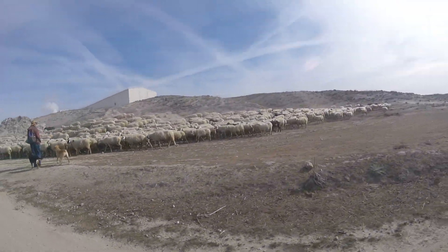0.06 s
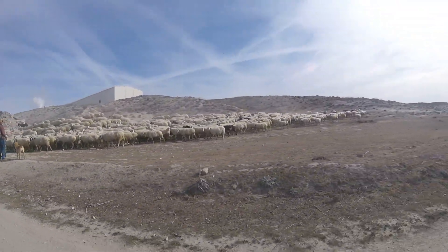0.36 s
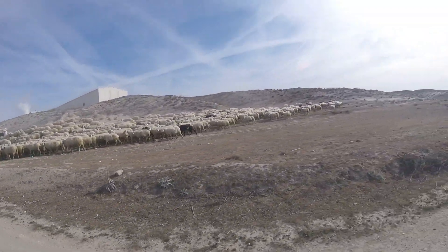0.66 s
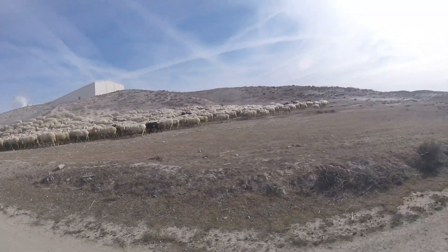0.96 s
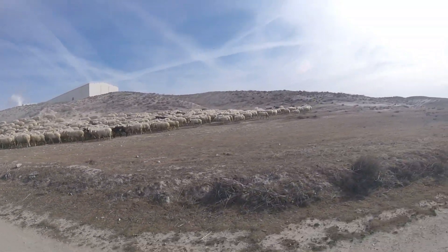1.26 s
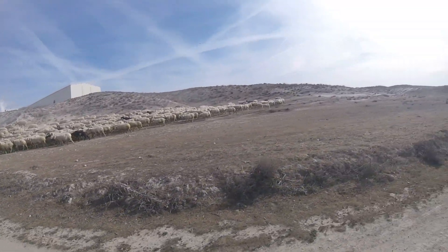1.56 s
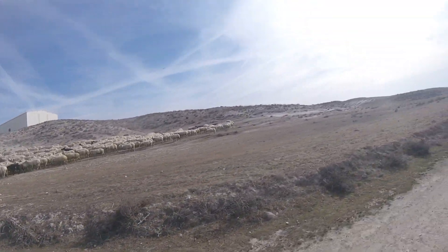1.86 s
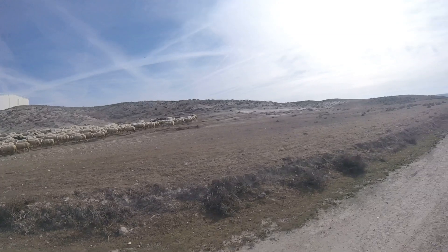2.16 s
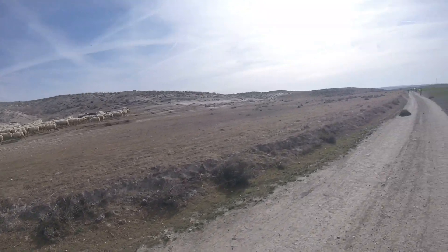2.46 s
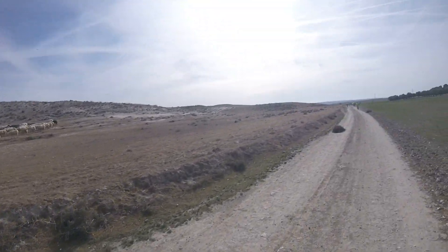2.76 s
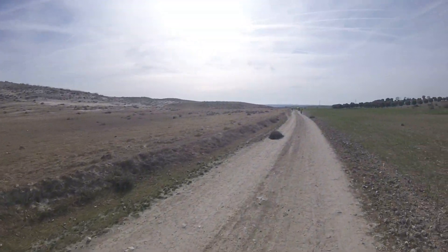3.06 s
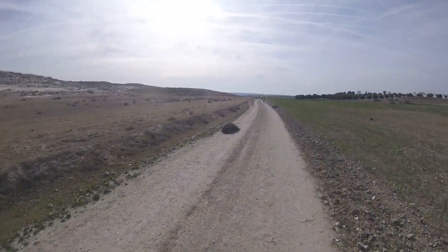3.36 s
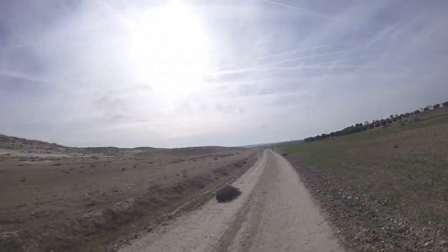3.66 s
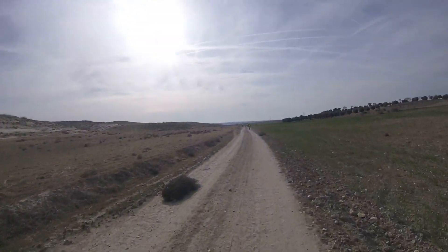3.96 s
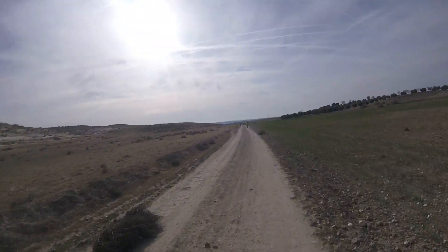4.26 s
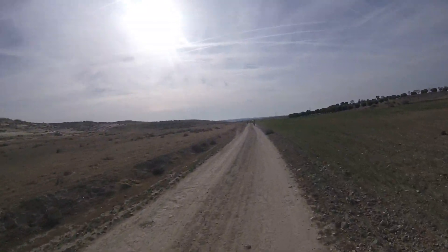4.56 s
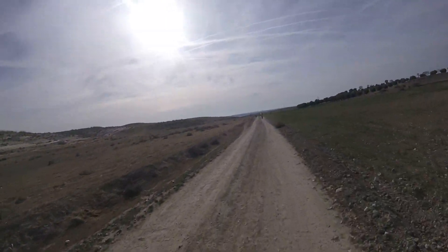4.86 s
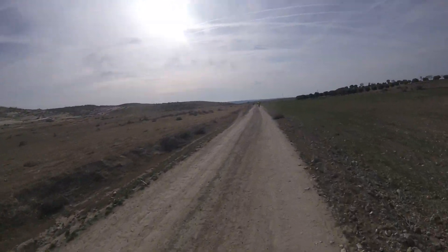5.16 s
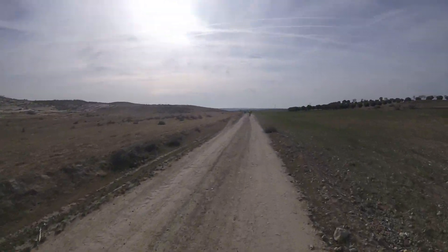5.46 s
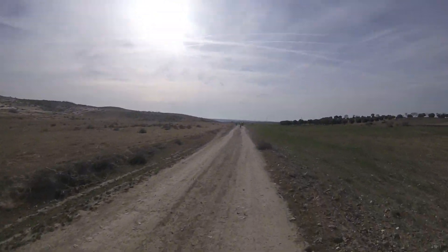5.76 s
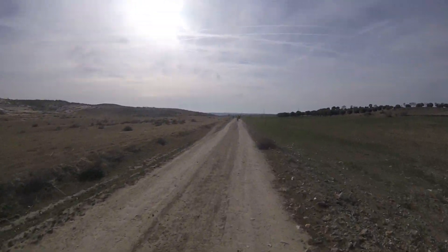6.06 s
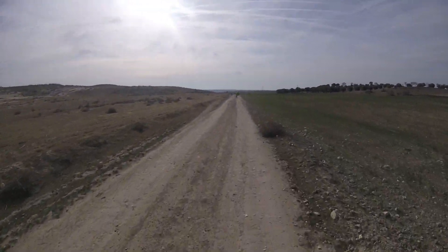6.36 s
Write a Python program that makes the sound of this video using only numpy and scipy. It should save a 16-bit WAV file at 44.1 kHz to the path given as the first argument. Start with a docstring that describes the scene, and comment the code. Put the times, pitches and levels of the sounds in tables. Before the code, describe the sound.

A bicycle rolls along a gravel track outdoors, heard from a microphone moving with it. For the first two seconds, wind dominates: a deep rumble with irregular buffeting, a fluttering rush and small slaps on the microphone. Scattered stone clicks come through, growing more frequent from about one second. Loose metal parts ping lightly around 1.7 and 2 seconds, with a faint rattle. By 2.4 seconds the wind falls to a lower rumble with brief gusts, leaving a soft tyre murmur and a faint hum from the bicycle. From about 3 to 5.7 seconds the tyres crunch through patches of loose gravel, and stones snap out in quick, sharp, irregular clicks, one stronger near 5.5 seconds. At about 5.7 seconds the wind returns with a hollow, buffeting roar, which continues over the crackling grit until the end at about 6.6 seconds.

```python
"""A gravel track in open country: a bicycle rolls round a bend and down the straight, carrying a camera.
Turbulent pressure buffets the microphone in the bend, drops to a low rumble, then picks up again.
Rolling contact makes the tyres murmur and the frame hum; grit crunches and stones snap out, their
impacts ringing briefly in the camera's housing. Loose metal parts rattle and ping faintly."""
import sys
import numpy as np
from scipy import signal
from scipy.fft import rfft, irfft, next_fast_len
from scipy.io import wavfile
from scipy.ndimage import uniform_filter1d

SR = 44100
rng = np.random.default_rng(int(sys.argv[2]) if len(sys.argv) > 2 else 0)


def master(y):
    """Save y as 16-bit WAV."""
    cut = np.clip(np.atleast_2d(y).T, -1, 1)
    pcm = np.round(cut * 32767)  # scale
    wavfile.write(sys.argv[1], SR, pcm.astype(np.int16))


N = 291501


def from_db(db):
    """Amplitude ratio of a level in decibels."""
    return 10 ** (np.asarray(db) / 20)

def unit_rms(x):
    """Normalisation to rms 1."""
    return x / np.sqrt(np.mean(x ** 2) + 1e-20)

def in_time(rows):
    """Linear interpolation of (time [s], value) rows at every sample."""
    return np.interp(np.arange(N) / SR, *np.transpose(rows))

def drift(hz):
    """Random modulation: low-passed noise of rms 1, computed at a tenth of the sample rate."""
    pole = np.exp(-20 * np.pi * hz / SR)
    slow = signal.lfilter([1], [1, -2 * pole, pole * pole], rng.standard_normal(N // 10 + 4002))[4000:]
    return np.interp(np.arange(N) / 10, np.arange(len(slow)), unit_rms(slow))

def swell(s, length):
    """Hann window, rising from 0 to 1 and back, centred on time s."""
    return np.cos(np.pi * np.clip((np.arange(N) / SR - s) / length, -.5, .5)) ** 2

def butterworth(x, hz, kind, order):
    """Filter with a maximally flat passband."""
    return signal.sosfilt(signal.butter(order, hz, kind, fs=SR, output="sos"), x)

def colour(x, spectrum):
    """Minimum-phase filtering by the given spectrum; rms 1."""
    size = 2 * next_fast_len(N // 2 + SR // 10)
    hz, level_db = np.transpose(spectrum)
    grid = np.maximum(np.fft.rfftfreq(size, 1 / SR), 1)
    magnitude = from_db(np.interp(np.log(grid), np.log(hz), level_db))
    cepstrum = irfft(np.log(magnitude))
    response = np.exp(rfft(2 * cepstrum[:size // 2], size))
    return unit_rms(irfft(rfft(x, size) * response)[:N])

def resonate(x, hz, width):
    """Damped resonator with a peak gain of 1."""
    r = np.exp(-np.pi * width / SR)
    feedback = [1, -2 * r * np.cos(2 * np.pi * hz / SR), r * r]
    return signal.lfilter(np.array([1, 0, -1]) * (1 - r * r) / 2, feedback, x)

def add(track, s, sound):
    """Superposition of a sound on a track at time s."""
    at = int(np.clip(s * SR, 0, N - 1))
    track[at:at + len(sound)] += sound[:N - at]

def lumpy_noise(spectrum, depth_db, lump_hz, steady_s):
    """Intermittency: noise comes in quick lumps while its longer-term power holds."""
    x = colour(rng.standard_normal(N) * from_db(depth_db * drift(lump_hz)), spectrum)
    return x / np.sqrt(uniform_filter1d(x * x, int(steady_s * SR) + 1) + 1e-9)


# Large, medium and fine eddies at the microphone, without gusts: (time [s], level [dB])
RUMBLE_LEVEL = [(0, -20.5), (0.9, -19.5), (1.3, -23.5), (1.8, -20), (2.0, -17.5), (2.45, -29.5),
                (2.65, -29), (2.95, -26.5), (3.2, -27.5), (3.8, -25.5), (4.45, -26), (5.55, -27.5),
                (5.75, -20.5), (5.95, -28.5), (6.1, -22.5), (6.5, -22), (6.61, -28)]
BUFFET_LEVEL = [(0, -19), (0.17, -20), (0.33, -15.5), (0.7, -21), (1.45, -19.5), (1.6, -22), (1.75, -22),
                (2.05, -26), (2.4, -37.5), (2.85, -36.5), (3.15, -42.5), (4.0, -39.5), (5.58, -42.5),
                (5.68, -26), (5.82, -21.5), (6.3, -22), (6.61, -20)]
RUSH_LEVEL = [(0, -32.5), (0.11, -52.5), (0.3, -32), (0.7, -29.5), (1.25, -29), (1.62, -27.5),
              (1.78, -34.5), (2.02, -34.5), (2.15, -43), (2.27, -41), (2.4, -54), (5.65, -62), (6.3, -49.5),
              (6.61, -47.5)]
# Gusts and lulls: (peak time [s], duration [s], rumble lift [dB], buffet lift [dB], rush lift [dB])
WIND_GUSTS = [(0.01, 0.069, 3, 4, 3.5), (0.16, 0.045, 6, -1, -6), (0.206, 0.062, 1, -4.5, 4),
              (0.406, 0.077, 3, 3.5, 3), (0.45, 0.043, 4, -3.5, -4.5), (0.506, 0.047, 1, -2, -5.5),
              (0.629, 0.033, 6, 4, 4), (0.72, 0.12, -9, -2.5, 3.5), (0.846, 0.11, 1, 7, -2.5),
              (0.891, 0.049, 0, 0, 4.5), (1.35, 0.1, 2.5, -2, 4), (1.614, 0.21, -4, 4, 2.5),
              (1.828, 0.053, -1, -5, 7), (1.883, 0.12, 9.5, 7.5, 0.5), (2.073, 0.083, 8, 8, 2),
              (2.241, 0.085, 4.5, 8, -15), (2.427, 0.11, -4, -7, -10), (2.808, 0.091, 10, 8, 14),
              (2.868, 0.081, 0, 11.5, 9.5), (2.93, 0.068, 8, 1, 0), (3.032, 0.16, 7.5, 4.5, 0),
              (3.153, 0.069, -3.5, 3, 0), (3.517, 0.11, -2, -13, 2), (3.674, 0.11, 0, 7.5, -2),
              (3.773, 0.064, 4, 6, 0), (3.97, 0.28, 2, 6, 6), (4.128, 0.093, 0.5, 7, -4),
              (4.275, 0.067, 0.5, 1, 0), (4.385, 0.24, -5.5, 3, -2), (4.52, 0.15, -3, 11.5, 14),
              (4.623, 0.041, 5.5, 6, 0), (4.735, 0.056, -2, 11, 0), (4.92, 0.25, -2, -20, -2),
              (5.101, 0.1, 4, 10, 18), (5.323, 0.054, 5.5, 1, 4), (5.382, 0.083, -4, -4, 0),
              (5.454, 0.1, 8.5, -8, 13), (5.632, 0.15, 9, 5, 15), (5.78, 0.082, 1, -1, -3),
              (6.41, 0.05, 1, -0.5, 5), (6.46, 0.053, -9, -8.5, 5), (6.502, 0.094, 3, -4.5, 6),
              (6.584, 0.051, -10, 3, 7.5)]

def wind_levels():
    """Unsteady flow: gusts on a mean wind set the levels of rumble, buffet and rush, in dB."""
    lift = sum(np.outer(lifts_db, swell(s, length)) for s, length, *lifts_db in WIND_GUSTS)
    return np.array([in_time(RUMBLE_LEVEL), in_time(BUFFET_LEVEL), in_time(RUSH_LEVEL)]) + lift

def eddying(x, depth_db=2.8, rate_hz=45):
    """Each eddy favours its own frequency, so half-octave bands fluctuate independently; rms 1."""
    size = next_fast_len(N)
    hz = np.maximum(np.fft.rfftfreq(size, 1 / SR), 1)
    half_octaves = np.clip(2 * np.log2(hz / 400), 0, 6)
    spectrum = rfft(x, size)
    bands = [irfft(spectrum * np.maximum(1 - abs(half_octaves - k), 0), size)[:N] for k in range(7)]
    return unit_rms(sum(band * from_db(depth_db * drift(rate_hz)) for band in bands))

# Spectra of the wind's pressure: (frequency [Hz], relative level [dB])
RUMBLE_SPECTRUM = [(12, -9), (25, -1.5), (48, 0), (75, -2.5), (110, -7), (160, -14), (260, -38.5),
                   (500, -66.5), (5000, -100)]
SIDE_WIND_SPECTRUM = [(12, -23), (25, -1.5), (48, -2.5), (75, -0.5), (110, -5), (160, -29), (260, -29.5),
                      (500, -70), (5000, -100)]
ROAR_SPECTRUM = [(60, -9), (115, 4.5), (210, -2), (320, 2), (480, -6.5), (620, -10.5), (850, -27),
                 (1500, -40), (4000, -73), (12000, -79)]
BUFFET_SPECTRUM = [(70, -14), (120, 6), (190, 3), (300, -6), (450, -11.5), (650, -18), (1000, -24.5),
                   (2500, -60.5), (12000, -100)]
RUSH_SPECTRUM = [(250, -8), (600, -3.5), (1200, 0.5), (2000, -8), (2800, -13), (3800, -22.5), (6500, -27),
                 (8500, -52), (10000, -39), (12500, -40), (14000, -63)]
# Buffeting that meets the housing head on: (time [s], share of power [0-1])
HEAD_ON_SHARE = [(2.76, 0), (2.82, 0.6), (2.88, 0.26), (2.93, 0), (5.65, 0.07), (5.7, 0.4), (5.8, 1),
                 (6.3, 0.5), (6.61, 0.97)]

def wind():
    """Turbulence on three scales presses on the microphone; a head wind sheds a hollow roar."""
    rumble_db, buffet_db, rush_db = wind_levels()
    in_bend = in_time([(2.05, 1), (2.35, 0)])
    head_on = in_time(HEAD_ON_SHARE)
    # the faster side wind in the bend has fewer of the very slowest eddies
    slow = lumpy_noise(RUMBLE_SPECTRUM, depth_db=0.5, lump_hz=67, steady_s=0.067)
    side = lumpy_noise(SIDE_WIND_SPECTRUM, depth_db=-1.5, lump_hz=28, steady_s=0.071)
    rumble = np.sqrt(1 - in_bend) * slow + np.sqrt(in_bend) * side
    rumble *= from_db(rumble_db + 1.8 * drift(10.3))
    roar = lumpy_noise(ROAR_SPECTRUM, depth_db=-0.5, lump_hz=150, steady_s=0.09)
    eddies = lumpy_noise(BUFFET_SPECTRUM, depth_db=3.0, lump_hz=52, steady_s=0.037)
    buffet = np.sqrt(1 - head_on) * eddies + np.sqrt(head_on) * roar
    buffet *= from_db(buffet_db + 1.3 * drift(9.2))
    # fine turbulence rides on the larger eddies, so the rush flutters with them
    flutter = unit_rms(from_db(3.0 * np.clip(-eddies, -2, 2)))
    rush = flutter * from_db(rush_db - 0.8 + drift(6.2))
    rush *= eddying(lumpy_noise(RUSH_SPECTRUM, depth_db=1.0, lump_hz=70, steady_s=0.18))
    return rumble + buffet + rush


# Murmur of the tyres: (time [s], level [dB])
TYRE_LEVEL = [(2.3, -42.5), (2.46, -41), (2.86, -47), (4.33, -44), (4.52, -41.5), (4.93, -44.5),
              (5.28, -44), (5.58, -45.5), (6.61, -48.5)]
# Its spectrum: (frequency [Hz], relative level [dB])
TYRE_SPECTRUM = [(150, -3), (380, 2), (650, 3.5), (950, 3.5), (1450, -5.5), (1850, -4), (2500, -9),
                 (3700, -21), (6000, -24), (11000, -43)]
# Hollow modes of the bicycle: (frequency [Hz], bandwidth [Hz], level [dB])
FRAME_MODES = [(263, 16.4, -45), (304.2, 12.3, -43.5), (886, 26, -59), (1133, 150, -53), (1880, 91, -64),
               (2020, 170, -67), (2680, 200, -76.5)]

def rolling(rasp_db=1.0, gain_db=1.0):
    """Roughness excitation: tyres rasp on packed earth and the frame hums at its modes."""
    murmur = from_db(in_time(TYRE_LEVEL) + gain_db + rasp_db * drift(20))
    murmur *= lumpy_noise(TYRE_SPECTRUM, depth_db=3.0, lump_hz=47, steady_s=0.22)
    hum = sum(from_db(db) * unit_rms(resonate(rng.standard_normal(N), hz, width))
              for hz, width, db in FRAME_MODES)
    return murmur + hum


# Modes of the camera's shell: (frequency [Hz], bandwidth [Hz], gain [dB])
HOUSING_MODES = [(3360, 200, 1), (6456, 150, 6)]

def housing(x):
    """Resonance of the shell lifts two narrow bands of every click."""
    return x + sum(from_db(db) * resonate(x, hz, width) for hz, width, db in HOUSING_MODES)

# Crunch on firm ground: (time [s], level [dB])
CRUNCH_LEVEL = [(0, -55), (0.25, -56), (0.5, -67), (0.85, -64), (1.18, -47.5), (1.55, -58), (2.0, -50.5),
                (2.6, -50.5), (2.78, -56.5), (3.8, -56.5), (4.7, -56.5), (5.05, -57), (5.4, -54.5),
                (5.9, -54), (6.3, -49), (6.61, -55)]
# Patches of loose gravel: (centre time [s], duration [s], lift [dB])
GRAVEL_PATCHES = [(2.988, 0.52, 8), (3.492, 0.24, 10.5), (3.89, 0.19, 10), (4.037, 0.29, 8.5),
                  (4.414, 0.44, 10.5), (4.66, 0.25, 12), (4.867, 0.25, 6.5), (5.148, 0.087, 8.5),
                  (5.635, 0.21, 13)]
# Spectrum of cracking grains: (frequency [Hz], relative level [dB])
GRIT_SPECTRUM = [(900, -12), (1800, 0.5), (2700, -1), (3800, -6.5), (5000, 3), (7000, 1.5), (9500, -1.5),
                 (10800, -2), (13000, -7), (15000, -44)]

def grit(per_s=170, clump_db=2.0, spread_db=5.5, crumble_s=0.0018, sand=0.4, ring_db=-14, gain_db=1.83):
    """Shot noise: grains crack at random, each a tiny decaying burst, over a hiss of sand."""
    cracks = rng.random(N) < per_s * from_db(clump_db * drift(40)) / SR
    sizes = from_db(spread_db * np.minimum(rng.exponential(1, N), 3.2))
    power = signal.lfilter([1], [1, -np.exp(-1 / (crumble_s * SR))], cracks * sizes ** 2 + 1e-12)
    bursts = (unit_rms(np.sqrt(power)) + sand) * rng.standard_normal(N)
    crunch = unit_rms(housing(colour(bursts, GRIT_SPECTRUM)))
    # the constant patter sustains the housing's upper mode
    ring = from_db(ring_db) * unit_rms(resonate(rng.standard_normal(N), HOUSING_MODES[-1][0], width=170))
    level_db = in_time(CRUNCH_LEVEL) + sum(db * swell(s, length) for s, length, db in GRAVEL_PATCHES)
    return from_db(level_db + gain_db + 2.0 * drift(23)) * (crunch + ring)


def spatter(until_s=2.1, per_s=45, over_rush_db=9.5, spread_db=2, thud_hz=260, crack_hz=1480):
    """Intermittency of the side wind: tiny random slaps in the bend, as rows like EDDY_SLAPS."""
    slots = np.arange(0, until_s, 1 / per_s)
    timing, strength, octaves = rng.uniform(-1, 1, (len(slots), 3)).T
    s = np.abs(slots + timing / per_s)
    rush_db = wind_levels()[2][(s * SR).astype(int)]
    crack_db = rush_db + over_rush_db + spread_db * strength
    thud_db = crack_db + 1.5
    pitch = 2 ** (.5 * octaves)
    return np.column_stack([s, thud_db, thud_hz * pitch, crack_db, crack_hz * pitch])

# Single eddies striking the microphone port:
# (time [s], thud level [dB], thud frequency [Hz], crack level [dB], crack frequency [Hz])
EDDY_SLAPS = [(0.004, -10, 301.8, -5, 810), (0.019, -9, 260, -10, 1000), (0.034, -3, 382, -6, 600),
              (0.079, -28, 230, -1.5, 800), (0.109, -8.5, 397, -11, 800), (0.394, -5, 480, -10, 800),
              (0.4025, -2, 450, -1, 950), (0.4158, 2, 276, 0, 550), (0.487, -1, 213.8, -5, 750),
              (0.593, -8, 250, -9, 1000), (0.6225, -17, 249, -9, 1290), (0.636, -10, 251.6, -9, 1700),
              (0.732, -10, 398, -15, 800), (1.551, -6, 174, -4, 1620), (1.583, -7, 281, -1.5, 1210),
              (1.606, -10, 250, -12, 1200), (1.6205, -11, 249, -9, 1940), (1.636, -5, 250, -13, 1420),
              (1.6476, -6.5, 250, -9, 1920), (1.6975, -2.5, 213, -0.5, 1120), (1.739, -1.5, 123, 2, 1210),
              (1.8575, -12, 250, -3, 1190), (1.8805, -6, 95.5, -22, 1000), (1.9625, -17, 200, -12, 1400),
              (1.9931, -29, 195.8, 1, 1100), (1.9969, -12, 310, 5, 1010), (2.0501, 1, 83, -9, 1370),
              (2.079, -27, 150, -8, 2100), (2.1856, -8, 78.4, -3.5, 1630), (5.6475, -3.5, 136, -18, 1100),
              (5.683, -13, 220, -14, 700), (5.744, -14, 220, -22, 700)]

def slaps(thud_cycles=0.79, crack_s=0.00035, soft_hz=2700, gain_db=-0.5):
    """Damped transients: a pressure spike rings the port, then a suction swings back more slowly."""
    out, t = np.zeros(N), np.arange(SR // 16) / SR
    for s, thud_db, thud_hz, crack_db, crack_hz in [*EDDY_SLAPS, *spatter()]:
        thud = from_db(thud_db) * np.sin(2 * np.pi * thud_hz * t) * np.exp(-t * thud_hz / thud_cycles)
        crack = from_db(crack_db) * np.sin(2 * np.pi * crack_hz * t) * np.exp(-t / crack_s)
        add(out, s, crack - thud)
    return from_db(gain_db) * butterworth(out, soft_hz, "low", order=3)


# The biggest stones snapping out from under the tyres: (time [s], body level [dB], knock re body [dB],
# body's upper re lower band [dB], top re body [dB], ring frequency [Hz])
STONE_IMPACTS = [(0.0597, -38, -13, 2, -23, 5270), (0.1786, -37, 2, -1, -13, 5400),
                 (0.1998, -39.5, -18, 2, -11, 5370), (0.955, -32, -6.5, 1, -33, 4900),
                 (1.0297, -33.5, -6, -4, -21, 3400), (1.0521, -37, -14, 0, -8, 5200),
                 (1.1415, -33.5, -3, -2, -21, 4196), (1.1815, -38, -10, 10, -17, 5600),
                 (1.257, -31.5, -5, -2, -28, 5100), (1.2818, -40, -10, 4, -18, 5200),
                 (1.434, -37, 0, 5, -9, 5600), (1.6782, -35, -5, -3, -15, 4800),
                 (1.8028, -32, -18, 3, -14, 5300), (1.8231, -27.5, -9, 1, -15, 5560),
                 (1.8671, -26, -7, -2, -15, 4620), (1.9524, -41, -10, 5, -7, 4900),
                 (2.0056, -30.5, 5, -2, -10, 3400), (2.0315, -37, 7, -18, -26, 3000),
                 (2.0497, -41, -1, -9, -21, 4500), (2.0685, -31.5, 1.5, -2, -16, 3600),
                 (2.1752, -36.5, 0, -6, -14, 3500), (2.2118, -38, -14, 4, -7, 5400),
                 (2.245, -39, -10, -4, -16, 2780), (2.372, -31.5, -22, -4.5, -17, 3100),
                 (2.4927, -44, -12, -4, -7, 5000), (2.5714, -39, -9, -4, -15, 5600),
                 (2.5919, -35, -15, 6, -7, 5650), (2.6104, -25.5, -12, -4, -9, 4850),
                 (2.665, -41, -18, 11, -5, 5300), (2.6971, -35.5, -18, -1, -6.5, 5500),
                 (2.8846, -35.5, -10, 1.5, -12, 3300), (2.9029, -35.5, -18, 12, -12, 5630),
                 (2.983, -40, -14, 0, -8, 5400), (3.019, -37.5, 0.5, 4, -12, 5000),
                 (3.1759, -44, 0, 6, -6, 5200), (3.203, -33, -8.5, 5, -9, 5130),
                 (3.3368, -41.5, 3, 3, -5, 2500), (3.3832, -36.5, -1.5, 1, -3.5, 3200),
                 (3.4377, -37.5, -6, 4, -4, 5600), (3.454, -31.5, -8, 6, -12, 3280),
                 (3.5135, -34.5, -12, 5, -8, 3200), (3.5506, -35.5, -17, 9, -5, 4900),
                 (3.648, -32.5, -10, -1, -12, 4800), (3.6983, -34.5, -5, 0, -15, 3430),
                 (3.7151, -43, -2, -2, -12, 5000), (3.866, -37.5, -5, 2, -5, 5700),
                 (3.8896, -31.5, -13, 5, -10, 4250), (3.977, -38.5, -3, 8, 0, 2700),
                 (4.0316, -29, -7, 0, -10, 3300), (4.0506, -33.5, -8, 10, -3, 5500),
                 (4.0714, -35.5, -5, 3, -5, 3400), (4.1752, -41.5, -8, 3, -9, 5200),
                 (4.2343, -34.5, -6, 2, -9, 4400), (4.2648, -33.5, -2.5, -1, -12, 3330),
                 (4.2908, -38, -7, -3, -2, 4800), (4.3128, -28.5, -8, 1.5, -9, 2640),
                 (4.3363, -38, -13, 11, -7, 5600), (4.3786, -40, -18, 15, -8, 5400),
                 (4.42, -36, -16, 13, -7, 4900), (4.443, -42, 2, 2, -1, 2700),
                 (4.458, -38.5, 1.5, 6, -6, 4500), (4.474, -38, -14, 3, -19, 5300),
                 (4.5328, -40, -6, 1, -5, 2500), (4.554, -38.5, -6, 12, -4, 4800),
                 (4.6181, -40, -14, 16, -7, 5600), (4.63, -40.5, -1, -2, -12, 5400),
                 (4.6724, -42, -5, 7, -13, 5000), (4.6815, -33, 2, -3, -10, 2500),
                 (4.6995, -41, -1, 6, -7, 5000), (4.763, -51, -13, 6, -7, 5500),
                 (4.7874, -43.5, -8, 9, -1, 5500), (4.8874, -44.5, -10, 6, -2, 5500),
                 (4.959, -38, 0.5, -2, -12, 3400), (5.1923, -39, 0, -1, -10, 3850),
                 (5.2355, -37, -16, 11, -2, 5640), (5.3085, -39, -1.5, 11, -3, 5630),
                 (5.3593, -33.5, -7, 6, -6, 5500), (5.4317, -37, 6, 11, 0, 2980),
                 (5.4499, -35.5, -8, 1, -1, 4900), (5.4793, -39, -8, 1, -2, 3400),
                 (5.506, -41, -18, 10, -1, 5400), (5.5234, -24.5, -10.5, 1.5, -11, 4300),
                 (5.5849, -42, -7, -1, -8, 5000), (5.603, -31, -3, 5, -8, 5000),
                 (5.6214, -35.5, -9, 3, -7, 5200), (5.6492, -37, 0, 1, -7, 5000),
                 (5.73, -38, -13, 5, -5, 5370), (5.7834, -48, 3, -3, -9, 2600),
                 (5.805, -38, -14, 7, -8, 5400), (5.829, -34.5, -5, -4, -12, 5270),
                 (5.8742, -50, -16, 10, -6, 5500), (5.895, -39, -17, 2, -12, 5400),
                 (5.9273, -47, -14, 10, -6, 5500), (5.9384, -35.5, -3.5, 8, -8, 5400),
                 (5.9649, -41.5, -12, 3, -4, 5200), (6.0524, -37, -13, 7, -8, 5600),
                 (6.0706, -42, -12, 10, -5, 5400), (6.0813, -35, -9, 0, -13, 4800),
                 (6.1808, -38, -12, 3, -14, 5370), (6.1998, -42, 6, 0, -4, 2530),
                 (6.3124, -44, -13, 8, -10, 3700), (6.3988, -43, -3, 15, -2, 5630),
                 (6.5023, -47, -10, 16, -4, 5200)]

def stones(click_db=11.0, ring_db=3, top_lift_db=0.5, crack_s=0.0005, crumble_s=0.0036, scatter_s=0.016):
    """Impact excitation: each stone gives a click, a heavily damped ring and a scatter of chips."""
    out, t = np.zeros(N), np.arange(SR // 16) / SR
    envelope = np.exp(-t / crack_s) + from_db(-6.5) * np.exp(-t / crumble_s)
    envelope += from_db(-19.5) * np.exp(-t / scatter_s)
    bands_hz = [1250, 2300], [2700, 5080], [5000, 6800], [7400, 11800]
    band_energy = 0.0052 * SR  # that of 5.2 ms at rms 1
    for s, db, knock_db, bright_db, top_db, hz in STONE_IMPACTS:
        snap = from_db(click_db) * (t == 0) + envelope * rng.standard_normal(len(t))
        burst = housing(snap + from_db(ring_db) * resonate(snap, hz, width=800))
        bands = [butterworth(burst, edges, "band", order=3) for edges in bands_hz]
        knock, lower, upper, top = [band * np.sqrt(band_energy / np.sum(band ** 2)) for band in bands]
        body = (lower + from_db(bright_db) * upper) / np.hypot(1, from_db(bright_db))
        impact = body + from_db(knock_db) * knock + from_db(top_db + top_lift_db) * top
        add(out, s, from_db(db) * impact)
    return out


# Modes of loose metal on the bicycle: (frequency [Hz], bandwidth [Hz], level [dB])
RATTLE_MODES = [(4360, 45, -67), (4900, 50, -59.5), (5300, 50, -65), (5500, 45, -58), (5870, 45, -61)]

def rattle(peak_s=2.03, lasts_s=4.1, per_s=90, spread_db=5.0):
    """Random impulses excite the modes of loose metal, most strongly on leaving the bend."""
    out = np.zeros(N)
    for hz, width, db in RATTLE_MODES:
        touches = (rng.random(N) < per_s / SR) * from_db(spread_db * rng.standard_normal(N))
        out += from_db(db) * unit_rms(resonate(touches + 1e-18, hz, width))
    return out * swell(peak_s, lasts_s)


# Light pings of metal parts: (time [s], level [dB], frequency [Hz], time to decay by 60 dB [s])
METAL_PINGS = [(1.731, -41, 4820, 0.18), (1.745, -56, 4430, .3), (1.985, -44, 4980, 0.2)]

def pings(width_hz=60):
    """Line broadening: loose parts chatter, blurring each ring into a decaying band of noise."""
    out, t = np.zeros(N), np.arange(SR // 2) / SR
    for s, db, hz, t60 in METAL_PINGS:
        chatter = unit_rms(resonate(rng.standard_normal(SR), hz, width_hz)[-len(t):])
        add(out, s, from_db(db - 60 * t / t60) * chatter)
    return out


def scene():
    """Superposition of wind and bicycle at one microphone."""
    return (wind() + slaps() + rolling() + grit() + stones() + pings() + rattle())[None]

def record(dry, edge_hz=9680, shelf_db=-16, cutoff_hz=13800):
    """Band limiting: the microphone's response steps down in the treble and the top is cut off."""
    below = butterworth(dry, edge_hz, "low", order=16)
    above = butterworth(dry, edge_hz, "high", order=16)
    low_pass = signal.cheby1(10, .3, cutoff_hz, fs=SR, output="sos")
    return signal.sosfilt(low_pass, below + from_db(shelf_db) * above)


dry = scene()
out = record(dry)
master(out)
```